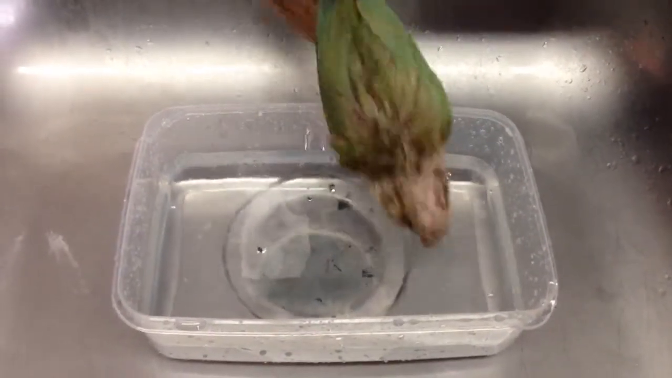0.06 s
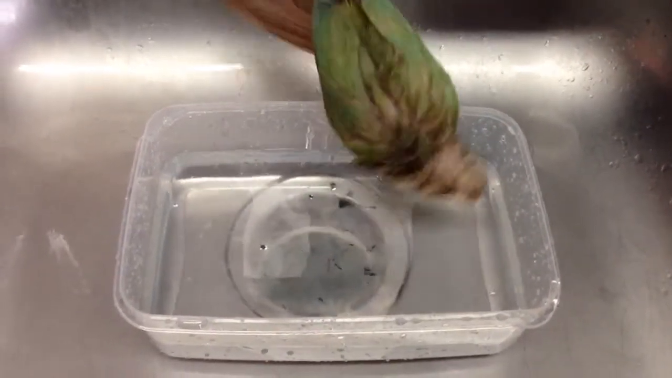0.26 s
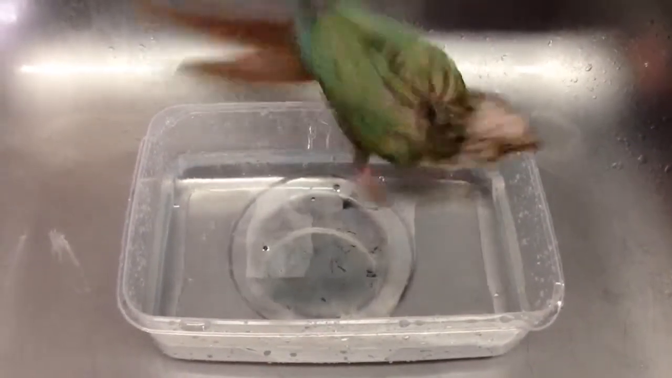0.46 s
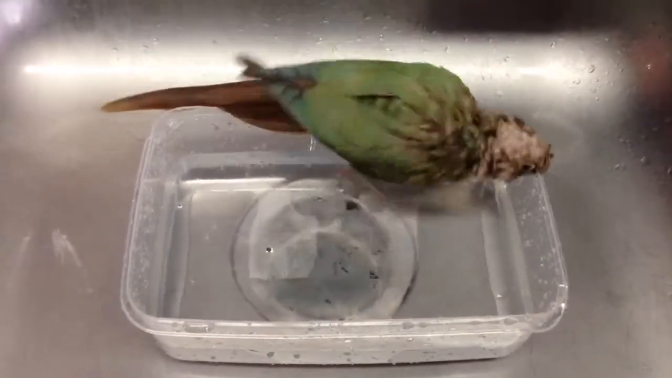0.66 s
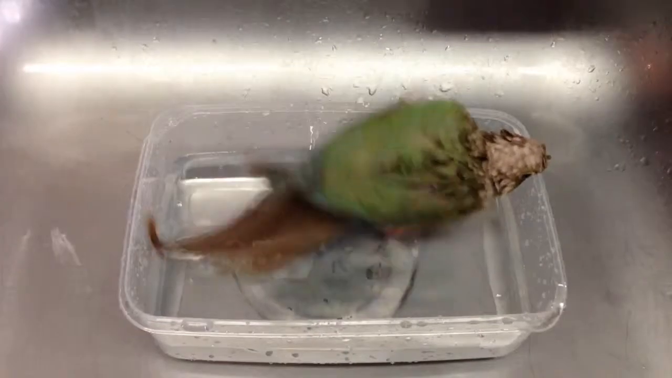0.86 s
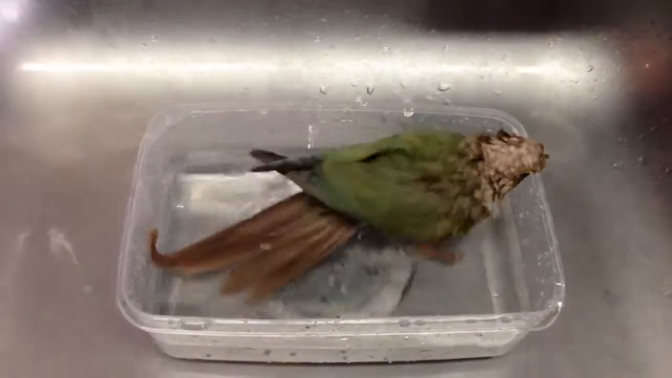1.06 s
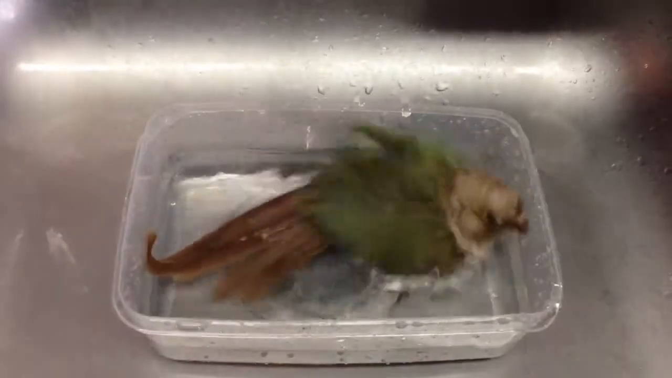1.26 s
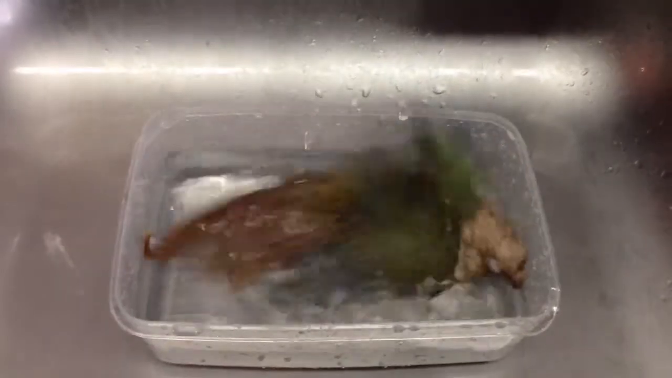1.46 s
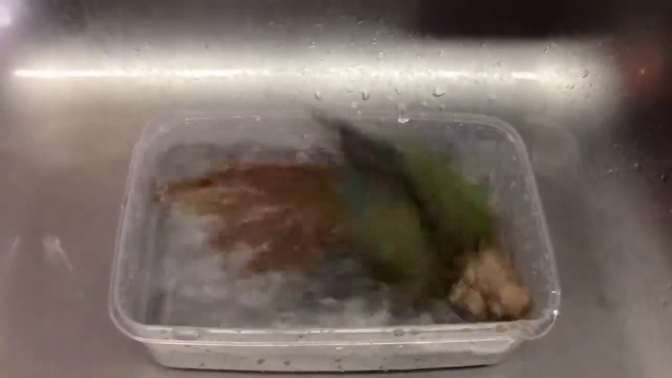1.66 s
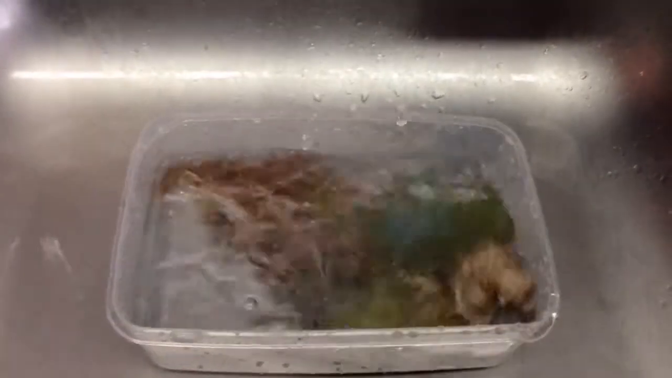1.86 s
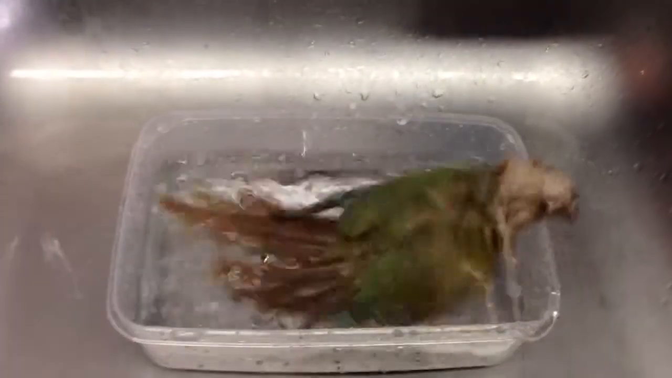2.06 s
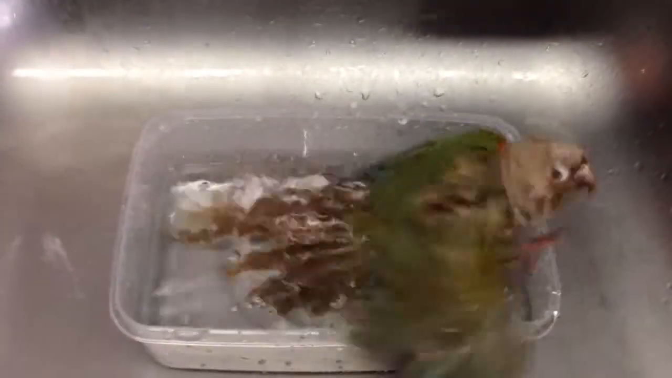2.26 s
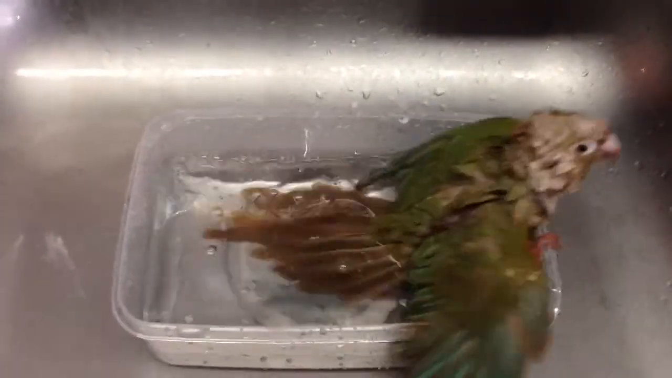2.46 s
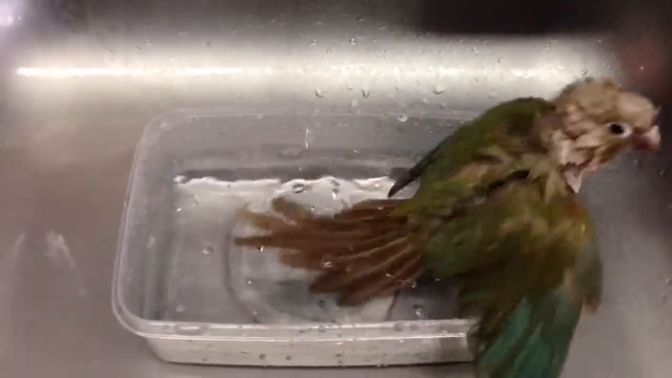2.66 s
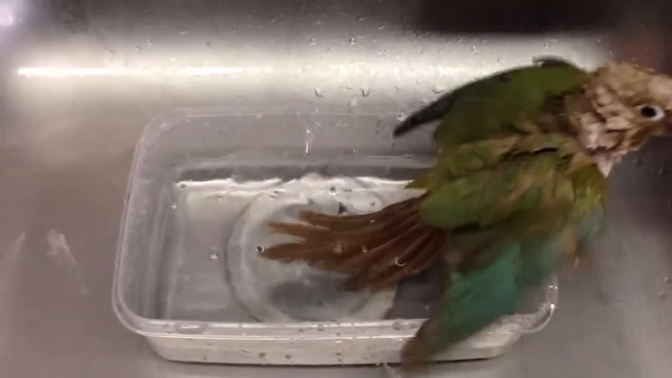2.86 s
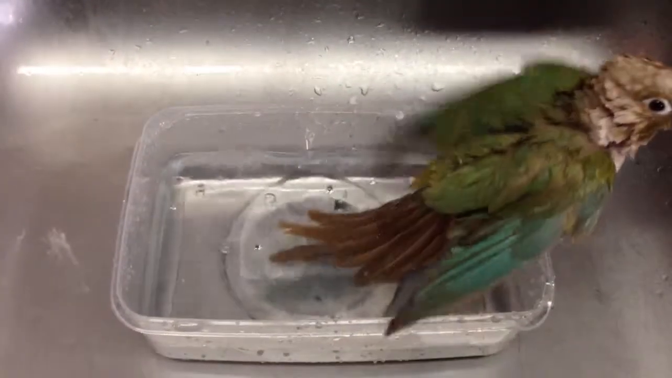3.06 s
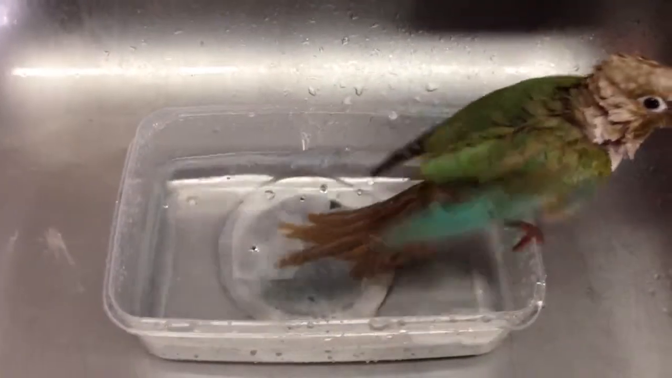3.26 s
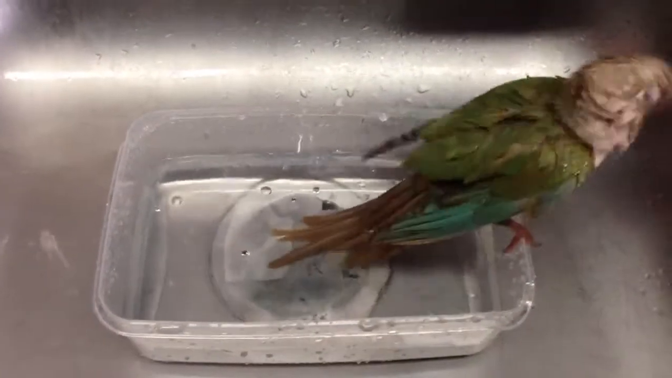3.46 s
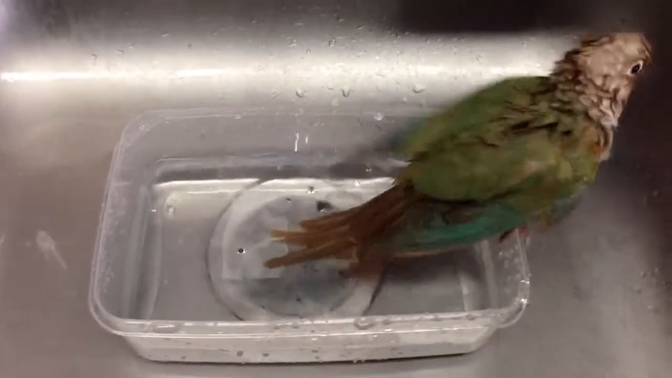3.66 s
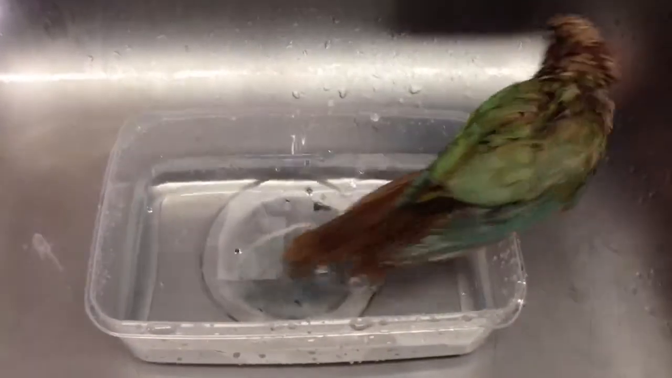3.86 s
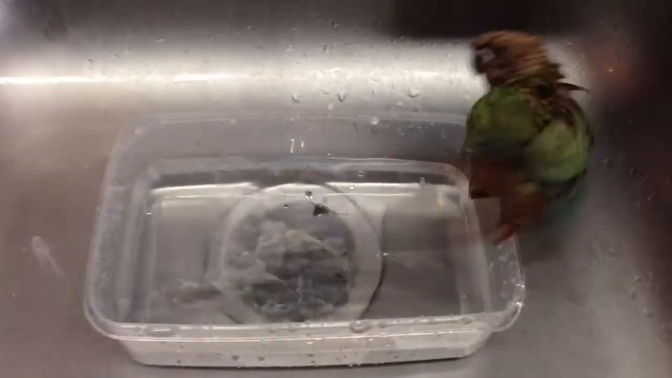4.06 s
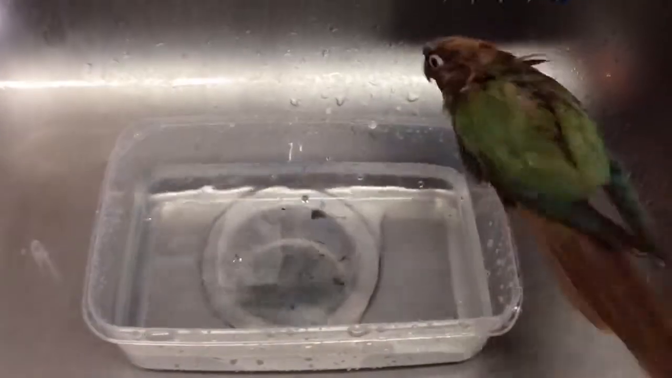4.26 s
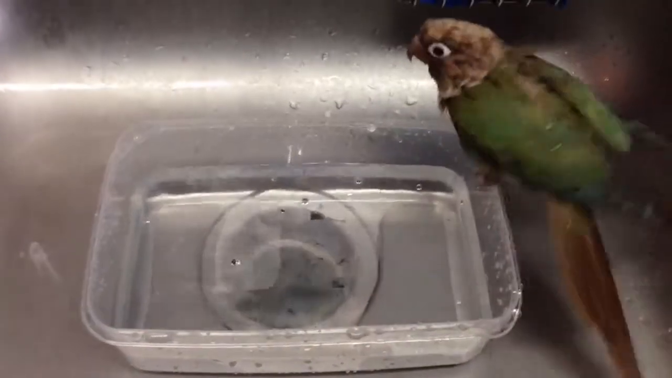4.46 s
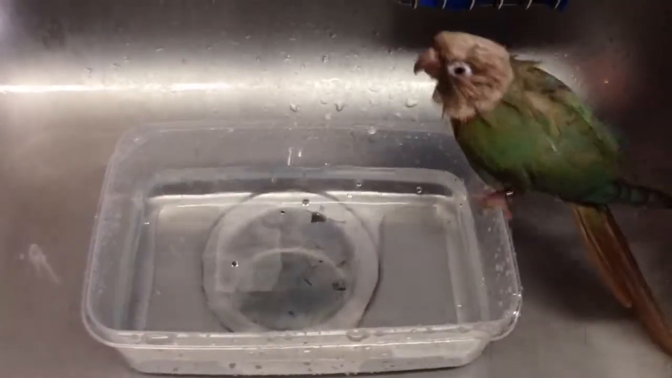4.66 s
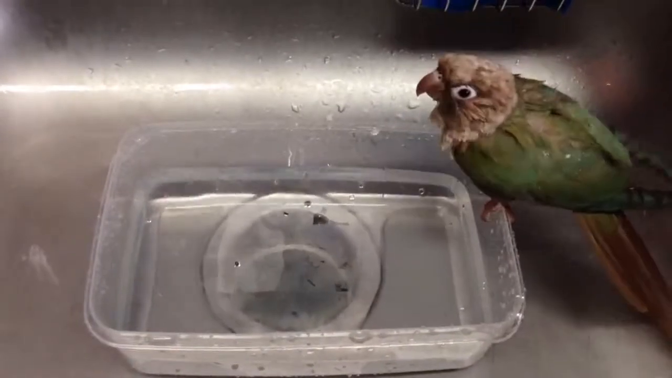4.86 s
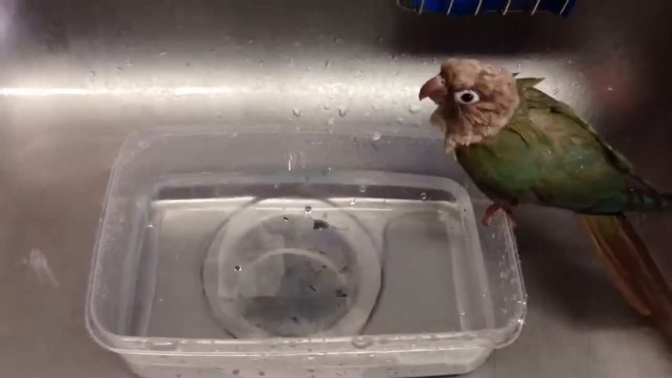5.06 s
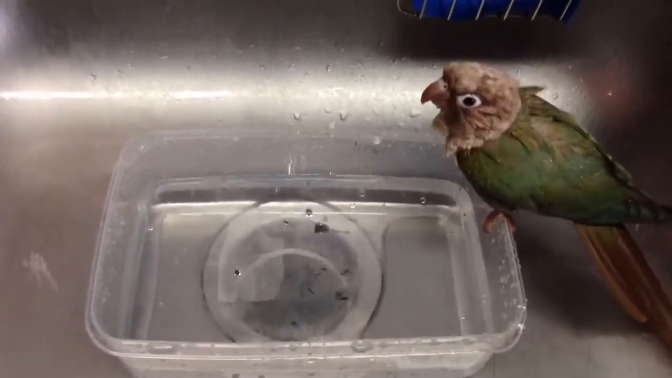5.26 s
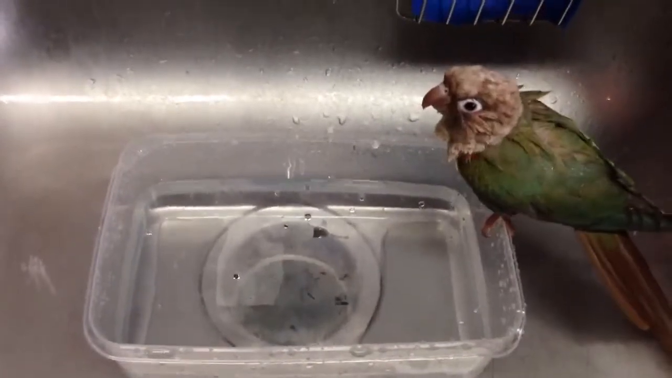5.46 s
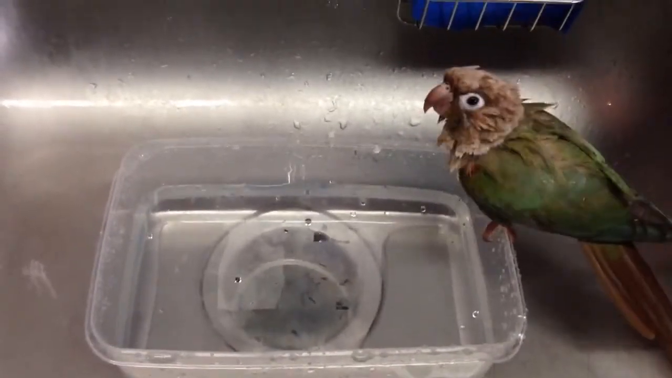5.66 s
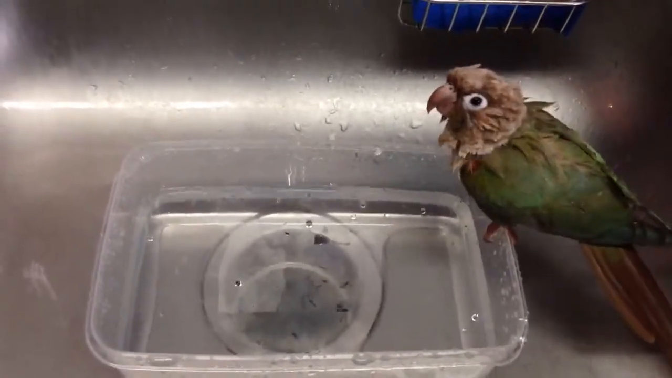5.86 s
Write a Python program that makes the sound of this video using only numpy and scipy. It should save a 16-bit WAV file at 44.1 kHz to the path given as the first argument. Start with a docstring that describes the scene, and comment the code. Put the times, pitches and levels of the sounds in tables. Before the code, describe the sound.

A small parrot bathes in a shallow plastic tub standing in a steel sink. Faint ticks come first, then hollow thumps as it hops onto the tub, then about a second of wet flapping with a loud slap and fizzing bubbles. Afterwards only occasional claw taps and soft plastic knocks remain. Close single-channel microphone, with light hiss and low room rumble.

```python
"""A steel sink with a plastic tub in it: a small parrot steps around the rim, hops in and bathes, close by.
Claws, wet wings and drops are short noise bursts with a ring and a rising note of their own.
Stirred water is a cloud of rising sine bubbles over flickering noise bands, and it shakes the tub.
Feet and body push the tub into its booming modes; microphone hiss and low room rumble lie underneath."""
import sys
import numpy as np
from scipy import signal
from scipy.fft import rfft, irfft
from scipy.io import wavfile
from scipy.ndimage import uniform_filter1d

SR = 44100
rng = np.random.default_rng(int(sys.argv[2]) if len(sys.argv) > 2 else 0)


def nominal_scale(level):
    """Amplitude ratio for a level in decibels (scalar or array-like)."""
    x = np.asarray(level, float) / 20
    return 10 ** x


def log_audio(samples):
    """Write samples as a 16-bit WAV file to the path given in sys.argv[1]."""
    # one column per channel
    frames = np.atleast_2d(samples).T
    # limit to full scale, then quantise
    limited = np.clip(frames, -1, 1)
    pcm = np.round(limited * 32767).astype(np.int16)
    wavfile.write(sys.argv[1], SR, pcm)


N = 261072
T = np.arange(N) / SR


def unit(x):
    """Scale to rms 1."""
    return x / np.sqrt(np.mean(x ** 2))


def band(x, lo_hz, hi_hz):
    """Butterworth band-pass."""
    return signal.sosfilt(signal.butter(2, [lo_hz, hi_hz], "bandpass", fs=SR, output="sos"), x)


def ring(x, hz, width_hz):
    """Two-pole resonance, gain 1 at the centre."""
    return signal.lfilter(*signal.iirpeak(hz, hz / width_hz, fs=SR), x)


def add(out, start_s, x):
    """Mix x into out from start_s."""
    i = int(start_s * SR)
    out[i:i + len(x)] += x[:N - i]


def walk(rate_hz):
    """Random levels, a new one every 1 / rate_hz s with straight slides between; spread a little under 1."""
    hold = int(SR / rate_hz)
    steps = np.repeat(rng.standard_normal(N // hold + 1), hold)
    return uniform_filter1d(steps, hold)[:N]


# Claws tick on the rim and sink; levels as rms over 10 ms.
# Columns: start_s, snap_db, ring_hz, crack_db (treble)
TICKS = [(0.171, -60.5, 945, -75), (.39, -62.5, 606, -68), (.406, -60.5, 625, -75),
         (0.6185, -41.5, 676, -50), (.689, -59.5, 5000, -68), (.8187, -61, 604, -65),
         (.902, -48, 7150, -46), (0.9271, -36.5, 772, -35.5), (1.0891, -43.5, 2700, -70),
         (1.1647, -62, 8400, -55.5), (1.18, -60, 8960, -53), (1.314, -59.5, 1510, -64),
         (1.3587, -41, 1390, -61), (2.6416, -55, 3300, -56.5), (2.6927, -58.5, 3660, -63),
         (2.7306, -50, 1910, -69), (2.778, -49.5, 1520, -57.5), (3.101, -40, 1910, -47),
         (3.6264, -46.5, 1990, -43.5), (4.2285, -61.5, 6900, -58.5), (4.361, -52.5, 5600, -49.5),
         (4.3659, -53, 4000, -49), (4.5729, -53.5, 765, -54.5), (4.609, -40.5, 9900, -37.5),
         (4.692, -50.5, 1990, -52.5), (4.6998, -49.5, 1370, -60), (4.9386, -50.5, 2480, -52.5),
         (5.4522, -63.5, 560, -84), (5.4714, -65, 4700, -62.5), (5.769, -60.5, 1280, -60.5)]


def ticks():
    """Hard claws: a sharp snap with the ring tucked under it and a treble crack."""
    out = np.zeros(N)
    for start_s, snap_db, ring_hz, crack_db in TICKS:
        add(out, start_s, hit(snap_db - 8, ring_hz, snap_db, crack_db, rise_ms=0.94))
    return out


# Wet wings slap the water; level as rms over 10 ms.
# Columns: start_s, snap_db, ring_hz, rise_ms
SLAPS = [(1.4853, -41.5, 508, 2.3), (1.512, -40.5, 2100, 3.6), (1.535, -44, 2800, 3.1),
         (1.595, -39.5, 2490, 5.8), (1.6984, -41, 4650, 0.78), (1.8213, -43.5, 1980, 1.9),
         (1.832, -41, 6160, 3.7), (1.8392, -26, 3510, 5.9), (1.8747, -32, 2030, 4.3),
         (1.9612, -38.5, 546, 3.4), (2.28, -49.5, 4500, 9.7), (2.3393, -41.5, 1850, 1.4)]


def slaps():
    """Wet wings: mostly slower bursts, ring and crack both well under the broad snap."""
    out = np.zeros(N)
    for start_s, snap_db, ring_hz, rise_ms in SLAPS:
        add(out, start_s, hit(snap_db - 9, ring_hz, snap_db, snap_db - 8.5, rise_ms))
    return out


# Drops and hollow taps with a clear pitch; level as rms over 10 ms.
# Columns: start_s, ring_db, ring_hz, rise_ms
PLOPS = [(0.157, -66, 1060, 2), (0.4585, -58, 582, 1.8), (0.6495, -32, 724, 2), (0.836, -59.5, 7300, .4),
         (0.8762, -61, 1520, 3.8), (.9582, -52.5, 692, 2.7), (.9701, -52, 730, 0.43),
         (1.101, -37, 1065, 1.4), (1.3646, -37, 2234, 2.4), (1.4605, -38, 3760, 2.1),
         (1.563, -44, 5600, .3), (1.644, -40, 3940, 5), (1.684, -44, 1955, 6.4), (1.7288, -42.5, 2090, 4.1),
         (1.7688, -51, 2010, 1.2), (1.7896, -52, 1800, .6), (1.92, -32.5, 3330, 3.6),
         (1.9306, -36, 3380, 1.6), (1.9694, -41.5, 4400, 0.94), (1.9835, -45, 8700, .2),
         (1.9926, -43, 2130, 0.79), (2.01, -42.5, 4000, .3), (2.0534, -43, 3610, 2.9),
         (2.075, -48, 3800, .65), (2.187, -60.5, 3270, 2.8), (2.2154, -55, 8800, 4.2),
         (2.2666, -54.5, 1810, 11), (2.31, -48.5, 4430, 9.5), (2.4196, -63, 6000, .5),
         (2.897, -59.5, 12300, 1.1), (3.06, -57.5, 728, 3.8), (4.07, -57, 6000, 1.9),
         (4.1912, -66, 750, 0.61), (4.211, -58, 650, 9.7), (4.5633, -53.5, 750, 1.3),
         (4.9217, -65.5, 645, 4.6)]


def plops():
    """Drops and taps: the ring leads, with the snap just under it and little crack."""
    out = np.zeros(N)
    for start_s, ring_db, ring_hz, rise_ms in PLOPS:
        add(out, start_s, hit(ring_db, ring_hz, ring_db - 3, ring_db - 18.5, rise_ms))
    return out


def hit(ring_db, ring_hz, snap_db, crack_db, rise_ms):
    """A gritty burst: a ring at its own pitch, a broad snap and a treble crack, smeared by the steel walls."""
    sink_t60_s, sink_db = 0.086, -4
    t = T[:SR // 8]
    noise, grit = rng.standard_normal((2, len(t)))
    rise_s = rise_ms / 1000
    after = np.maximum(t - rise_s, 0)
    swell = np.minimum(t / rise_s, 1) ** 1.02
    # a slow, wet slap also ends slowly
    fall = np.exp(-after / (0.0011 + 0.5 * rise_s))
    sink_tail = nominal_scale(sink_db - 60 * after / sink_t60_s)
    roughness = nominal_scale(1.05 * unit(uniform_filter1d(grit, size=24)))
    burst = noise * swell * (fall + sink_tail) * roughness

    # trapped air sings a short clear note that rises as it dies
    note = np.sin(2 * np.pi * ring_hz * t * (0.97 + 4 * t))
    note = note * swell * np.exp(-after / (6.5 / ring_hz + rise_s))
    width_hz = 80 + 0.26 * ring_hz
    rung = ring(ring(burst, ring_hz, width_hz), ring_hz, width_hz)
    voiced = unit(rung) + unit(note)
    snap = band(burst, min(0.47 * ring_hz, 1900), min(1500 + 2.0 * ring_hz, 6000))
    crack = band(burst, 4040, 10700)

    out = np.zeros(len(t))
    for part, level_db in [(voiced, ring_db), (snap, snap_db), (crack, crack_db)]:
        # level is the part's whole energy counted as 10 ms
        out += nominal_scale(level_db) * part * np.sqrt(SR / 100) / np.linalg.norm(part)
    return out


# Bouts of stirred water; each level sets the main part of its layer.
# Columns: start_s (full level reached), hold_s, spray_db, fine_spray_db, tub_rumble_db
BOUTS = [(0.657, 0.041, -65, -74, -52), (0.883, 0.1, -65.5, -57, -58.5), (1.161, 0.018, -68.5, -67, -62),
         (1.34, 0.018, -59.5, -56, -63.5), (1.479, 0.099, -50.5, -50.5, -59),
         (1.636, 0.098, -50.5, -58.5, -64), (1.852, 0.16, -45.5, -47, -50),
         (2.16, 0.082, -69.5, -65.5, -65), (2.311, 0.028, -52, -49, -56.5)]


def splash():
    """Bubbles, crackle and flickering fizz; the moving water shakes the tub."""
    fizz = nominal_scale(1.7 * walk(90)) * rng.standard_normal(N)
    bubbles = drops(count=2600, lo_hz=1500, hi_hz=7000, cycles=3.5, spread_db=2.8)
    spray = bubbles + nominal_scale(-4.5) * unit(band(fizz, 1900, 6600))
    crackle = drops(count=4000, lo_hz=5000, hi_hz=13300, cycles=0.85, spread_db=2.5)
    fine = crackle + nominal_scale(-15.5) * unit(band(fizz, 5900, 17300))

    slosh = nominal_scale(6.7 * walk(40)) * rng.standard_normal(N)
    rumble = unit(band(tub(slosh), 167, 3000)) + nominal_scale(-7.5) * unit(band(slosh, 160, 820))

    spray_db, fine_db, rumble_db = np.transpose(BOUTS)[2:]
    out = stirring(spray_db, settle_db_per_s=252) * spray
    out += stirring(fine_db, settle_db_per_s=252) * fine
    out += stirring(rumble_db, settle_db_per_s=146) * rumble
    return out


def drops(count, lo_hz, hi_hz, cycles, spread_db):
    """Random bubbles while the water is stirred: short sines that rise as they die, a few far louder."""
    out = np.zeros(N)
    first_s, last_s = BOUTS[0][0] - 0.1, BOUTS[-1][0] + 0.2
    for when, pitch, size, life in rng.random((count, 4)):
        hz = lo_hz * (hi_hz / lo_hz) ** pitch
        turns = cycles * (0.5 + life)  # cycles until the bubble has died to 1/e
        phase = np.arange(int(5 * turns * SR / hz) + 2) * hz / SR
        wave = np.sin(2 * np.pi * phase * (1 + 0.037 * phase / turns)) * np.exp(-phase / turns)
        loudness = nominal_scale(-spread_db * np.log(1 - size))
        add(out, first_s + when * (last_s - first_s), loudness * wave)
    active = out[int(first_s * SR):int(last_s * SR)]
    return out / np.sqrt(np.mean(active ** 2))


def stirring(levels_db, settle_db_per_s):
    """Gain of the bouts: each swells, holds and settles along straight dB slopes."""
    swell_db_per_s = 353
    gain = np.zeros(N)
    for (start_s, hold_s, *_), level_db in zip(BOUTS, levels_db):
        swell_db = swell_db_per_s * np.maximum(start_s - T, 0)
        settle_db = settle_db_per_s * np.maximum(T - start_s - hold_s, 0)
        gain += nominal_scale(level_db - swell_db - settle_db)
    return gain


# Feet and body thud on the tub.
# Columns: start_s, peak_db, push_hz (where the push is strongest)
THUDS = [(0.46, -52.5, 226), (0.625, -31.5, 287), (0.658, -31, 385), (0.762, -52, 366), (0.93, -32, 256),
         (0.948, -35.5, 248), (1.107, -37.5, 400), (1.319, -59, 272), (1.364, -45.5, 269.3),
         (1.464, -42, 240), (1.482, -45, 245), (1.643, -57.5, 288), (1.836, -25, 424), (1.85, -23, 255),
         (1.916, -32, 253), (1.959, -40, 425), (1.995, -36, 275), (2.319, -48, 256), (2.355, -46, 270),
         (2.672, -43.5, 260), (2.717, -50.5, 261), (2.787, -49, 282), (3.071, -50, 270),
         (3.095, -43.5, 254), (3.621, -45.5, 260), (4.195, -46, 267), (4.377, -57, 269), (4.575, -49, 256),
         (4.669, -53, 333), (4.93, -51, 371), (5.458, -58, 260)]


def thuds():
    """A soft push of a few ms; where it lands decides which tub mode speaks most."""
    out, t = np.zeros(N), T[:SR // 3]
    for start_s, peak_db, push_hz in THUDS:
        push = rng.standard_normal(len(t)) * t * np.exp(-t / 0.0039)
        modes = tub(ring(push, push_hz, width_hz=143.0) + 0.5 * push)
        boom = unit(band(modes, 185, 2600)) + 0.2 * unit(band(push, 116, 255))
        add(out, start_s, nominal_scale(peak_db) * boom / np.abs(boom).max())
    return out


# Modes of the plastic tub; levels are relative, before weighting by ring time.
# Columns: mode_hz, level_db, t60_s
TUB = [(250.7, -2.5, 0.18), (278.6, 3, 0.068), (371, -5, 0.12), (585, -4, 0.06), (709, -3, 0.043),
       (957, -4.5, 0.083), (1126, -24, 0.42), (1490, -3, 0.067)]


def tub(push):
    """The plastic tub rings in its modes when pushed, longer modes weighted up by their ring time."""
    out = np.zeros(len(push))
    for mode_hz, level_db, t60_s in TUB:
        width_hz = np.log(1000) / np.pi / t60_s  # bandwidth that dies 60 dB in t60_s
        out += nominal_scale(level_db) * ring(push, mode_hz, width_hz) * t60_s
    return out


# Spectrum of the background hiss and rumble; only its shape counts.
# Columns: freq_hz, density_db (relative, per Hz)
HISS = [(32, -57), (55, -40), (86, -12.5), (174, -5), (210, -13), (266, -3.5), (306, -5), (387, -7.5),
        (526, -12.5), (681, -11.5), (1020, -18), (2730, -17.5), (3070, -15), (15200, -21)]


def hiss():
    """Microphone hiss and low room rumble: steady noise shaped along a log-frequency curve."""
    level_db = -65  # rms
    freq_hz, density_db = np.transpose(HISS)
    f = np.maximum(np.fft.rfftfreq(N, 1 / SR), 1)
    shape = nominal_scale(np.interp(np.log(f), np.log(freq_hz), density_db))
    noise = irfft(rfft(rng.standard_normal(N)) * shape, N)
    return nominal_scale(level_db) * unit(noise)


def scene():
    """Bird and water in the sink, over hiss, on one channel."""
    struck = ticks() + slaps() + plops()
    # every tick, slap and plop also sets the tub's modes ringing faintly
    sympathy = nominal_scale(20.5) * tub(struck)
    return (struck + sympathy + thuds() + splash() + hiss())[None]


def band_limit(x):
    """A steep low-pass at the top of the band."""
    return signal.sosfilt(signal.butter(12, 16430, fs=SR, output="sos"), x)


def record(dry):
    """The microphone side cuts the deep bass and, steeply, the top."""
    low_cut = signal.butter(2, 70, "highpass", fs=SR, output="sos")
    top_cut = signal.ellip(6, 0.3, 22, 15300, fs=SR, output="sos")
    mix = signal.sosfilt(top_cut, signal.sosfilt(low_cut, dry))
    return band_limit(mix)


dry = scene()
out = record(dry)
log_audio(out)
```